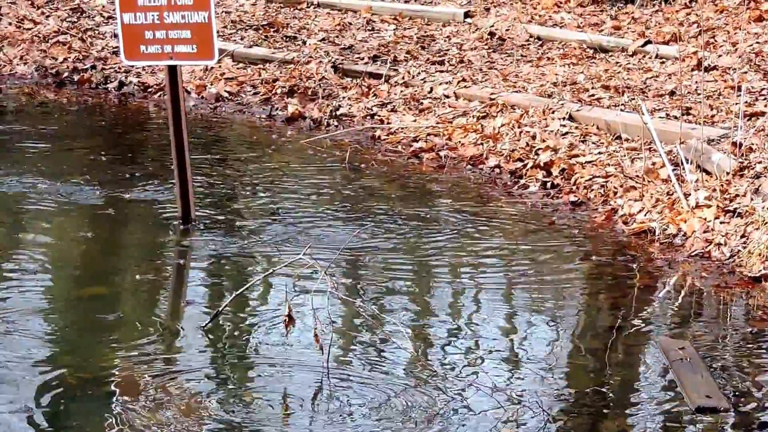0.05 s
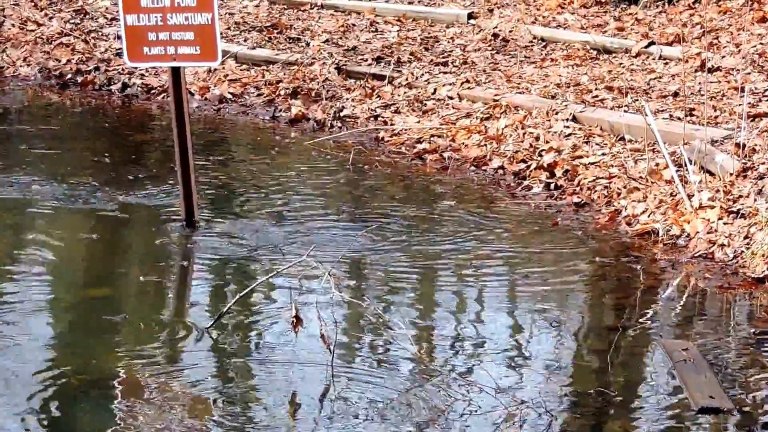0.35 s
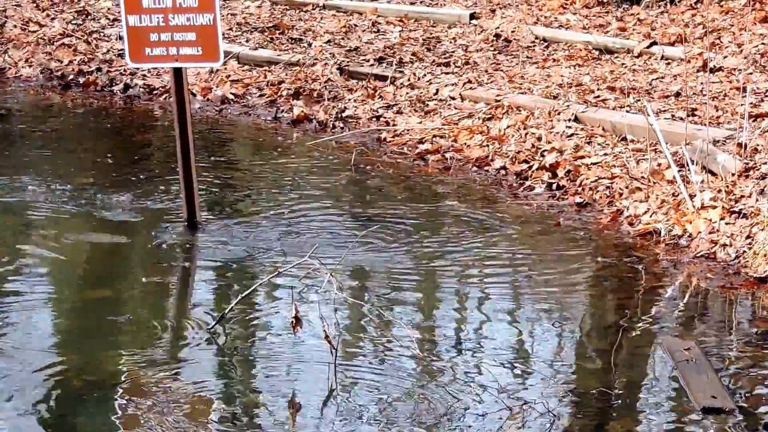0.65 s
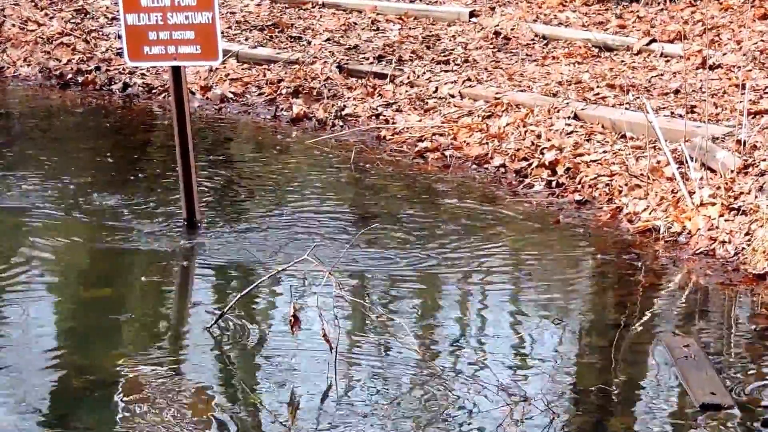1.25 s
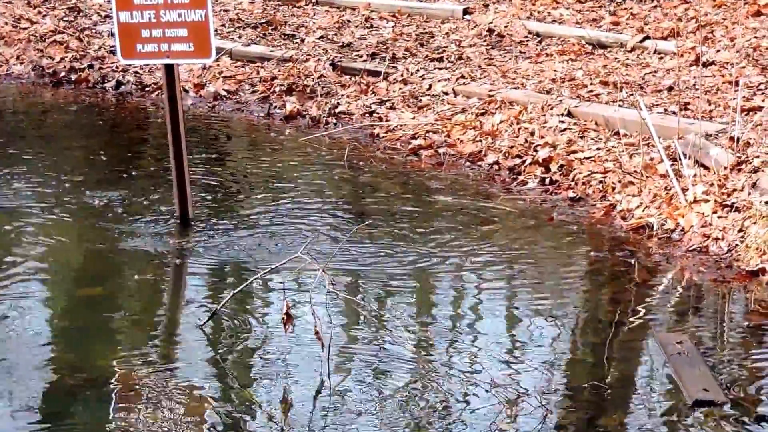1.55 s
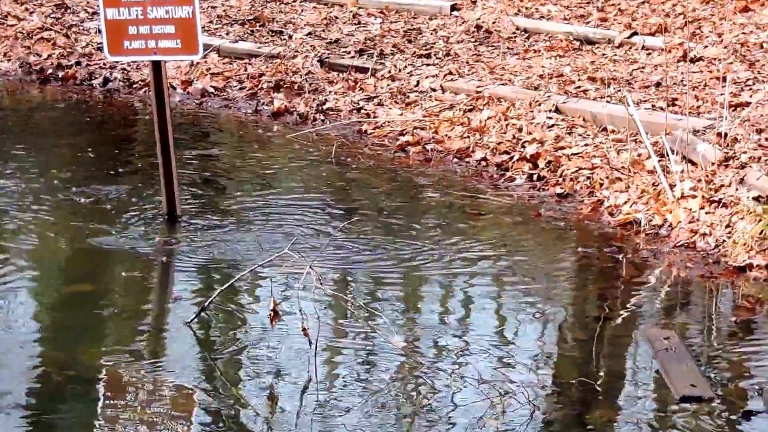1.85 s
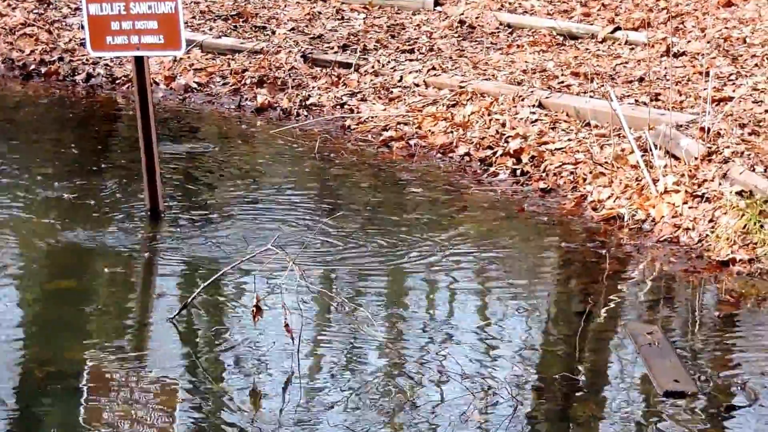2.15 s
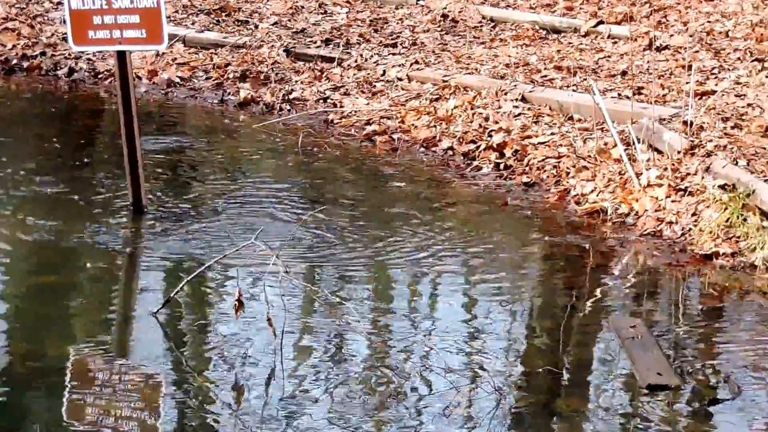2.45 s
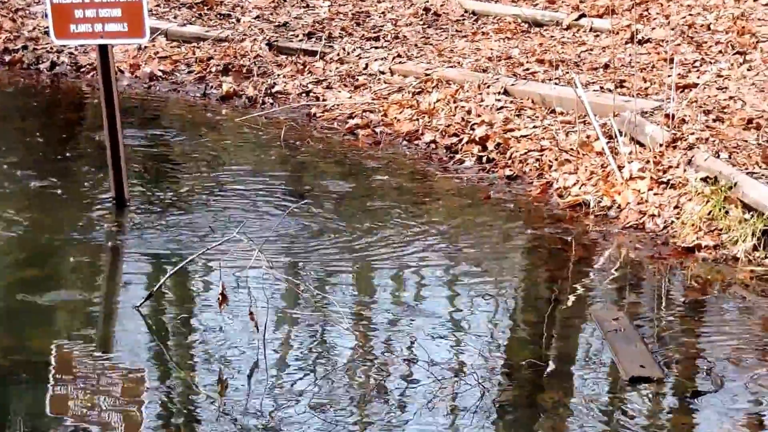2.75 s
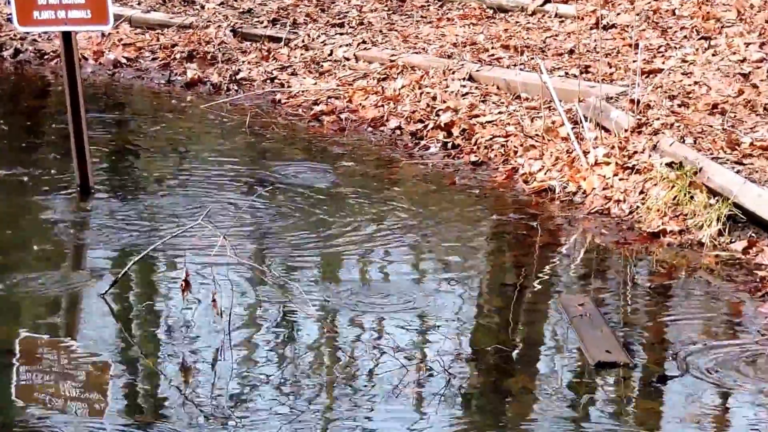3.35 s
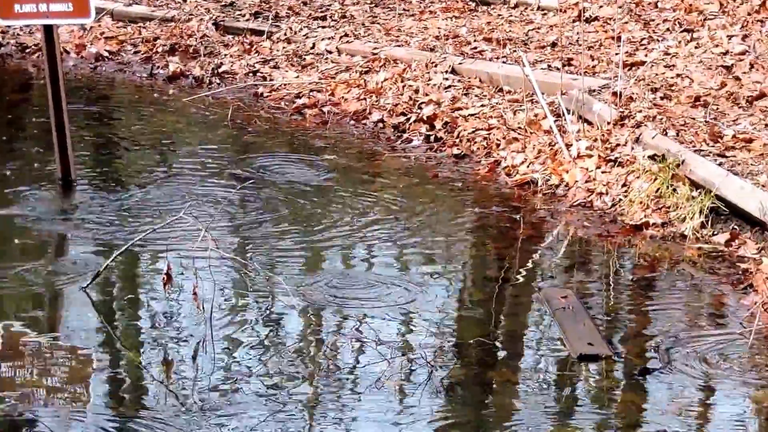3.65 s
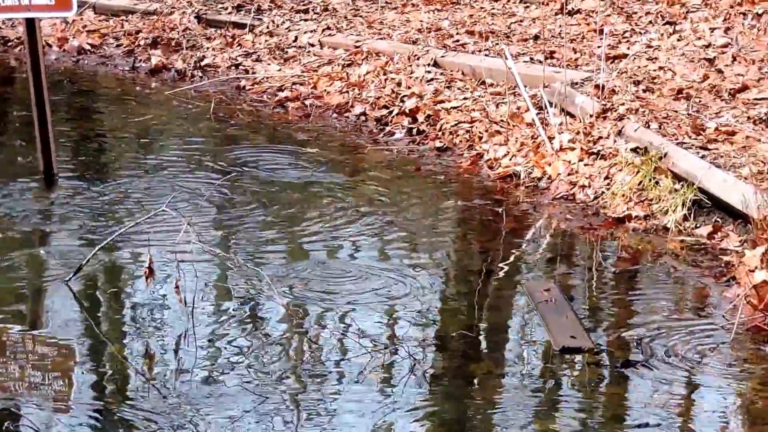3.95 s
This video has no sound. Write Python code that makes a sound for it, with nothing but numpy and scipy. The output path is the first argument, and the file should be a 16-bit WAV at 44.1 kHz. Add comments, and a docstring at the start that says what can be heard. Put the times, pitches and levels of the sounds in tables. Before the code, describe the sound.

A chorus of frogs clucks and croaks in quick, overlapping bursts at a woodland pond.

```python
"""A low rumble and a faint hiss lie over a woodland pond, and from the start a chorus of frogs clucks.
Each croak is a short, quickening run of clicks that rings the vocal sacs and throat.
More frogs call from farther off, and the trees echo them all.
Around the first second a distant bird gives four thin whistles, and a high chip joins the last one.
A second chip comes near the end, while the frogs keep calling."""
import sys
import numpy as np
from scipy import signal
from scipy.fft import rfft, irfft
from scipy.io import wavfile
from scipy.ndimage import map_coordinates

SR = 44100
rng = np.random.default_rng(int(sys.argv[2]) if len(sys.argv) > 2 else 0)


def master_out(mix):
    """Clip the mix to full scale and print it as 16-bit PCM to the path in sys.argv[1]."""
    frames = np.transpose(np.atleast_2d(mix))
    ceiling = np.clip(frames, -1, 1)
    pcm = np.round(ceiling * 32767).astype(np.int16)
    wavfile.write(sys.argv[1], SR, pcm)


N = 176400


def undb(db):
    return 10 ** (np.asarray(db) / 20)


def level(x, db):
    """Set a sound's RMS level."""
    return x * undb(db) / np.sqrt(np.mean(x ** 2))


def add(out, x, start):
    """Mix a stereo sound in at a time in seconds."""
    i = int(np.clip(start * SR, 0, N - 1))
    out[:, i:i + x.shape[1]] += x[:, :N - i]


def pan(left_db):
    """Left and right gains for a level difference."""
    return undb(np.array([[left_db], [-left_db]]) / 2)


def resonance(f, hz, width_hz):
    """Response of a ringing band-pass."""
    return 1j * f * width_hz / (hz ** 2 - f ** 2 + 1j * f * width_hz)


def steep(s, order):
    """Response of a low-pass at s = j f / edge; 1 / s gives a high-pass."""
    return 1 / np.polyval(signal.butter(order, 1, analog=True)[1], s)


def background():
    """The bed: a distant rumble and a wavering drone near the centre, under a wide, faint hiss."""
    # tone curve of rumble and hiss: f/Hz, relative level/dB
    air_curve = [(20, -1.5), (50, 1.5), (110, 2.5), (180, -2), (300, -10), (550, -13.5), (2000, -21),
                 (6000, -45), (16000, -53)]
    hz, db = np.array(air_curve).T
    f = np.maximum(np.fft.rfftfreq(N, 1 / SR), 1)
    tone = undb(np.interp(np.log(f), np.log(hz), db))
    mid, side, hum = rfft(rng.standard_normal((3, N)))
    side = side * np.clip(0.087 + f / 4160, 0, 1)  # the image widens toward the treble
    air = irfft(np.array([mid + side, mid - side]) * tone)
    drone = irfft(hum * resonance(f, hz=78.5, width_hz=6.9) ** 2)
    return (level(air, db=-41) + level(drone, db=-45.5)) * pan(left_db=1.45)


def woods(x, t60_s=0.44, build_s=0.0073, wet_db=-7):
    """Scattered echoes from bank and trunks, different at each ear."""
    t = np.arange(SR) / SR
    envelope = np.exp(-np.log(1000) * t / t60_s) * np.minimum(t / build_s, 1)
    tail = rng.standard_normal((2, SR)) * envelope
    tail *= undb(wet_db) / np.sqrt(np.sum(tail ** 2) / 2)
    return signal.fftconvolve(x, tail, axes=1)[:, :N]


def bird_notes(notes, length_s, from_hz, to_hz):
    """Pure notes that rise in pitch and level off."""
    out = np.zeros((2, N))
    progress = np.linspace(0, 1, int(length_s * SR))
    hz = from_hz + (to_hz - from_hz) * progress * (2 - progress)
    note = np.sin(2 * np.pi * np.cumsum(hz) / SR) * np.sin(np.pi * progress)
    for start, db in notes:
        add(out, level(note, db) * pan(0), start)
    return out


def birds():
    """Small birds whistle and chip in the distance."""
    # thin, nearly steady whistles: t/s, level/dB
    whistles = [(.67, -64), (.8, -66), (.93, -63.5), (1.15, -62)]
    # quick rising chips: t/s, level/dB
    chips = [(1.143, -70), (3.817, -69)]
    return (bird_notes(whistles, length_s=.12, from_hz=2980, to_hz=3060)
            + bird_notes(chips, length_s=.02, from_hz=6200, to_hz=8100))


def click_run(f, length_s, throat_hz, jitter, swell_peak):
    """Spectrum of the uneven clicks that drive a croak: they quicken, swell and fade."""
    gap_scatter, size_scatter = rng.standard_normal((2, 32))
    settled_s = 2 / throat_hz  # the clicks settle at one for every two cycles of the throat
    slow_start = 1 + .45 * np.exp(-np.arange(32) * settled_s / 0.00601)
    gaps = settled_s * slow_start * np.exp(jitter * gap_scatter)
    times = np.cumsum(gaps) - gaps
    swell = np.interp(times / length_s, [0, swell_peak, 1], [.62, 1, .38])
    sizes = swell * undb(2.5 * size_scatter)
    sounding = times < length_s
    return sizes[sounding] @ np.exp(-2j * np.pi * np.outer(times[sounding], f))


def croak(length_s, sac_db, sac_hz, throat_db, throat_hz, kind="plain"):
    """A run of clicks rings the vocal sacs, the throat, an overtone and a faint high rasp."""
    # frog voices by kind: click jitter, swell peak/share of length, upper edge/multiple of sac f,
    # rasp f/Hz, rasp level/dB relative to the sacs
    voices = {"plain": (.075, 0.42, 1.62, 4502.5, -39.5), "hoarse": (0.07, .4, 3.8, 4347, -32),
              "sharp": (0.17, 0.33, 3, 4450, -35.5), "shrill": (.04, .45, 1.7, 3350, -26)}
    jitter, swell_peak, edge_ratio, rasp_hz, rasp_db = voices[kind]
    size, ceiling_hz, throat_lag_s, glide = 4096, 2453, 0.00027, .07
    f = np.maximum(np.fft.rfftfreq(size, 1 / SR), 1)
    clicks = click_run(f, length_s, throat_hz, jitter, swell_peak)
    clicks = clicks * steep(628 / (1j * f), order=7)  # the voice falls off steeply below the throat
    detune, damping, lag, side = rng.standard_normal(4)  # each croak has its own colour and place
    dull = steep(1j * f / min(edge_ratio * sac_hz, ceiling_hz), order=5)
    overtone_hz = min(1.39 * sac_hz, ceiling_hz) * np.exp(.08 * detune)
    sac = resonance(f, sac_hz, width_hz=218 * np.exp(.35 * damping)) * dull
    throat = resonance(f, throat_hz, width_hz=66) * dull * np.exp(-2j * np.pi * f * throat_lag_s)
    overtone = -resonance(f, overtone_hz, width_hz=140) * dull
    rasp = resonance(f, rasp_hz, width_hz=520) ** 2
    layers = [(sac, sac_db), (throat, throat_db), (overtone, sac_db - 25.5), (rasp, sac_db + rasp_db)]
    voice = sum(level(irfft(clicks * shape), db) for shape, db in layers)
    voice *= np.sqrt(length_s * SR / size)  # levels count over the croak's length, not the buffer's
    progress = np.minimum(np.arange(size) / (length_s * SR), 1)
    speed = 1 + glide * (progress - .5)  # the pitch bends up through the croak
    left = map_coordinates(voice, [np.cumsum(speed)])
    ear_lag_s = .00005 * (1 + lag)
    right = irfft(rfft(left) * np.exp(-2j * np.pi * f * ear_lag_s))
    return np.array([left, right]) * pan(left_db=2.5 + 1.8 * side)


def far_frogs(per_s=30):
    """Weaker croaks from farther off fill the gaps."""
    out = np.zeros((2, N))
    for start in np.arange(0, N / SR, 1 / per_s):
        late, loud, sac, throat = rng.standard_normal(4)
        call = croak(length_s=.035, sac_db=-47 + 2 * loud, sac_hz=1260 * np.exp(0.14 * sac),
                     throat_db=-51.5 + 2 * loud, throat_hz=780 * np.exp(0.1293 * throat))
        add(out, call, start + .5 * late / per_s)
    return out


def near_frogs():
    """The foreground croaks, scattered over the pond and leaning left."""
    # croak cues: t/s, length/s, sac level/dB, sac f/Hz, throat level/dB, throat f/Hz, voice if not plain
    croaks = [(0.018, 0.049, -30, 1390, -39, 740), (0.087, 0.028, -25, 1400, -38, 690),
              (0.105, 0.024, -35, 2080, -39, 800), (0.128, 0.02, -30, 1580, -34, 900, 'hoarse'),
              (0.156, 0.016, -32, 1490, -41, 670), (0.203, 0.021, -31, 1770, -34, 860),
              (0.226, 0.026, -31, 1430, -37, 760), (0.29, 0.027, -34, 1410, -41, 720),
              (0.408, 0.039, -32, 1280, -42, 720), (0.474, 0.025, -30, 1230, -40, 680),
              (0.506, 0.042, -38, 1420, -41, 790), (0.654, 0.019, -43, 2280, -51, 800),
              (0.703, 0.041, -32, 1480, -36, 780), (0.748, 0.036, -36, 2120, -41, 980, 'sharp'),
              (0.792, 0.022, -31, 2100, -37, 920, 'sharp'), (0.832, 0.027, -34, 1430, -40, 880),
              (0.895, 0.025, -26, 1360, -41, 700), (0.919, 0.023, -27, 1520, -35, 710),
              (0.985, 0.037, -36, 1480, -42, 740), (1.038, 0.024, -35, 2250, -39, 920, 'sharp'),
              (1.112, 0.035, -31, 1390, -33, 830, 'hoarse'), (1.248, 0.026, -30, 1390, -36, 920),
              (1.275, 0.037, -33, 1470, -37, 810), (1.323, 0.047, -31, 1440, -37, 770, 'hoarse'),
              (1.463, 0.024, -34, 1450, -45, 900), (1.486, 0.021, -29, 1250, -36, 860),
              (1.605, 0.037, -33, 1510, -38, 770), (1.665, 0.025, -37, 1610, -46, 770),
              (1.7, 0.027, -34, 1520, -38, 850), (1.733, 0.049, -32, 1600, -35, 740, 'sharp'),
              (1.832, 0.03, -34, 1170, -40, 780), (1.868, 0.029, -26.5, 1400, -39, 990, 'sharp'),
              (1.905, 0.045, -33.5, 1660, -37, 760, 'hoarse'), (1.958, 0.056, -32, 1330, -35, 870, 'sharp'),
              (2.055, 0.038, -30, 1230, -41, 830, 'shrill'), (2.105, 0.027, -33, 1350, -37, 810),
              (2.133, 0.027, -34, 1520, -37, 750), (2.175, 0.027, -33, 1630, -43, 870),
              (2.213, 0.029, -31, 1330, -38, 900), (2.245, 0.035, -31, 1280, -36, 830),
              (2.313, 0.019, -37, 1770, -46, 750), (2.342, 0.028, -29, 1270, -35, 870),
              (2.455, 0.025, -35, 1480, -42, 710), (2.48, 0.027, -33, 1560, -34, 910),
              (2.522, 0.035, -31, 1410, -36, 790), (2.643, 0.02, -39, 2330, -47, 740),
              (2.712, 0.022, -33, 1360, -40, 800), (2.768, 0.031, -32, 1450, -36, 830),
              (2.833, 0.035, -29, 1390, -36, 770, 'hoarse'), (2.862, 0.028, -29, 1490, -37, 770, 'hoarse'),
              (2.892, 0.035, -32, 1430, -37, 720), (2.935, 0.027, -31, 1400, -36, 800, 'hoarse'),
              (2.963, 0.024, -34, 1460, -35, 730), (3.0, 0.032, -32, 1470, -38, 890, 'hoarse'),
              (3.09, 0.03, -33, 1570, -41, 760), (3.127, 0.024, -35, 1520, -44, 720),
              (3.129, 0.02, -36, 2230, -51, 740), (3.213, 0.02, -39, 1300, -41, 770),
              (3.265, 0.02, -25, 1620, -31, 920, 'sharp'), (3.298, 0.02, -29.5, 1650, -36, 880, 'sharp'),
              (3.324, 0.052, -38, 1380, -45, 750), (3.388, 0.026, -32, 1480, -40, 730),
              (3.44, 0.024, -29, 1590, -34, 840), (3.464, 0.033, -33, 1330, -37, 740),
              (3.51, 0.027, -30, 1340, -35, 690), (3.54, 0.027, -34, 1570, -39, 720),
              (3.572, 0.04, -35, 1370, -42, 950), (3.709, 0.031, -30, 1380, -36, 830, 'shrill'),
              (3.745, 0.032, -35, 1440, -37, 800), (3.812, 0.025, -33, 1410, -41, 750),
              (3.863, 0.022, -36, 2080, -43, 820), (3.895, 0.032, -33, 1630, -35, 750),
              (3.933, 0.019, -34, 1380, -39, 780), (3.968, 0.026, -33, 1530, -41, 740, 'hoarse')]
    out = np.zeros((2, N))
    for start, *call in croaks:
        add(out, croak(*call), start)
    return out


def scene():
    """Frogs and birds echo among the trees, over the rumble."""
    bed = background()
    calls = birds() + near_frogs() + far_frogs()
    return bed + woods(calls) + calls


def record(dry, top_hz=15700):
    """A steep low-pass trims the very top of the mix."""
    return signal.sosfilt(signal.ellip(10, .2, 70, top_hz, fs=SR, output="sos"), dry)


dry = scene()
out = record(dry)
master_out(out)
```